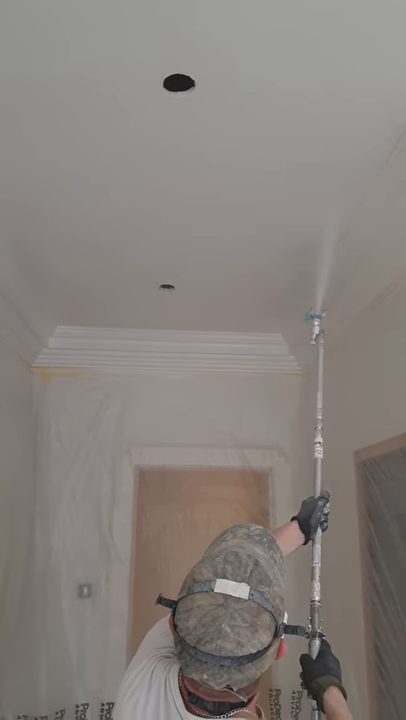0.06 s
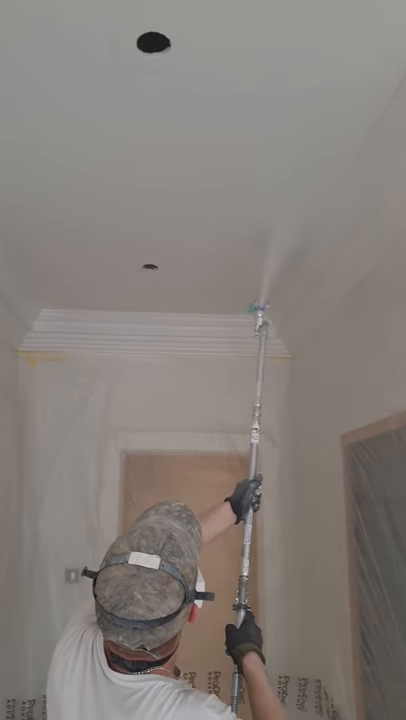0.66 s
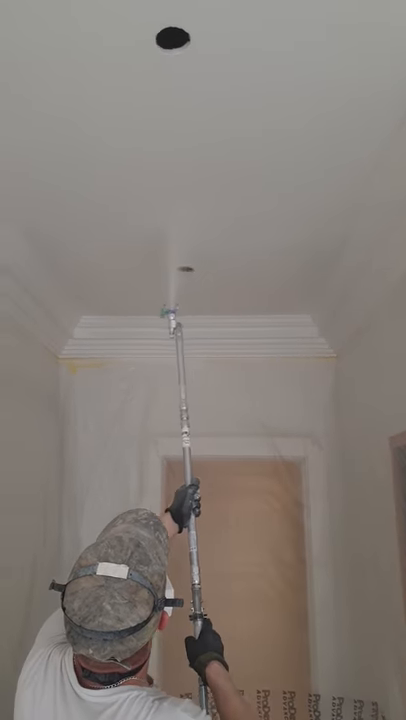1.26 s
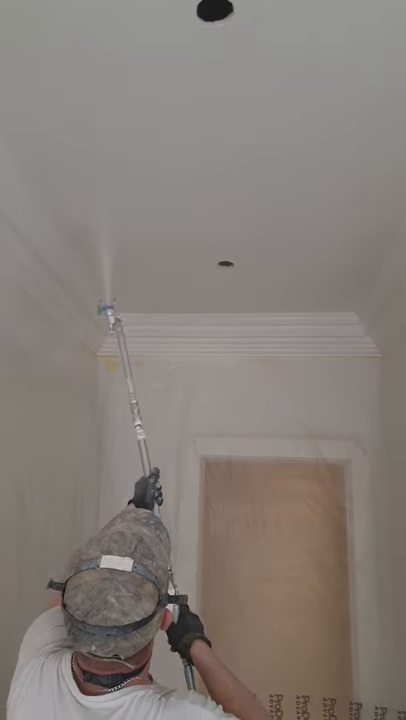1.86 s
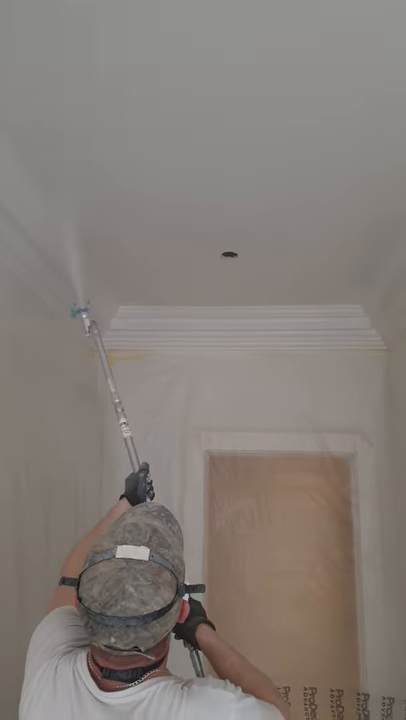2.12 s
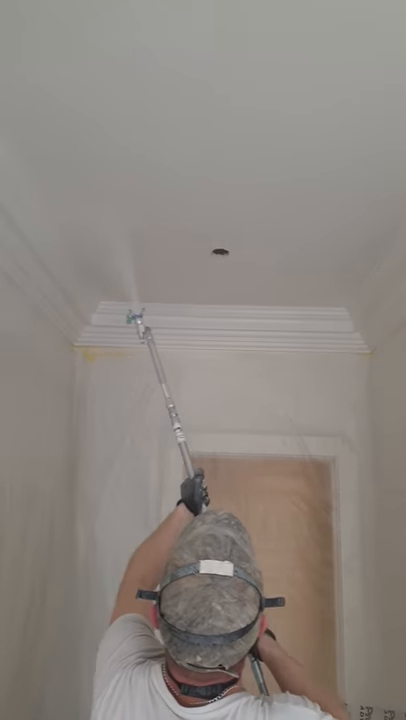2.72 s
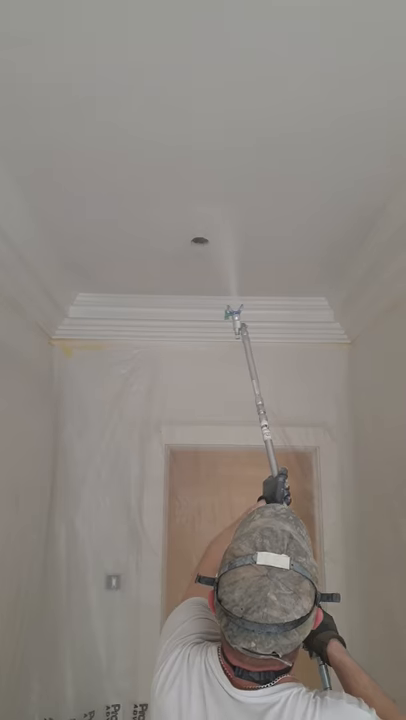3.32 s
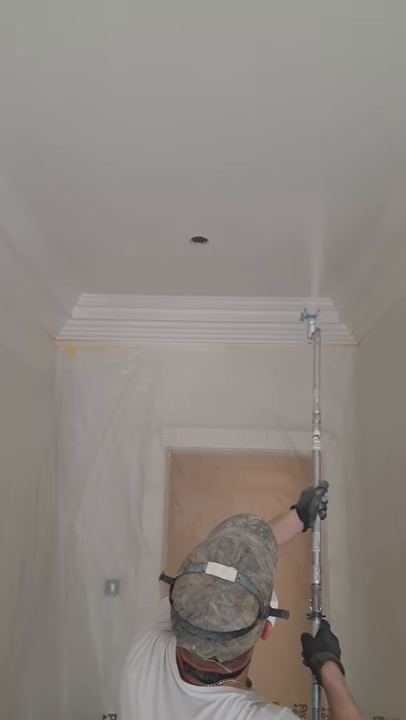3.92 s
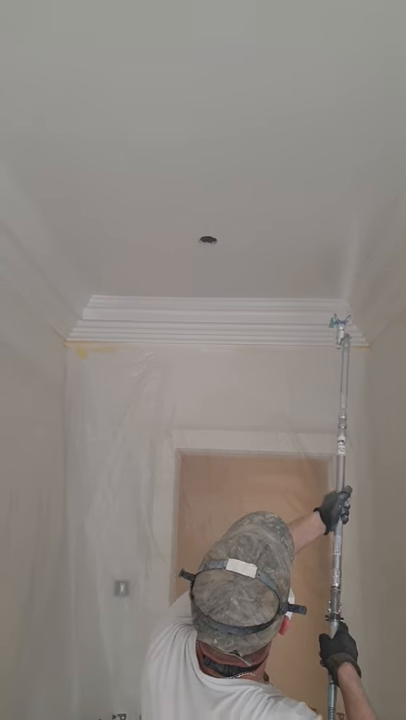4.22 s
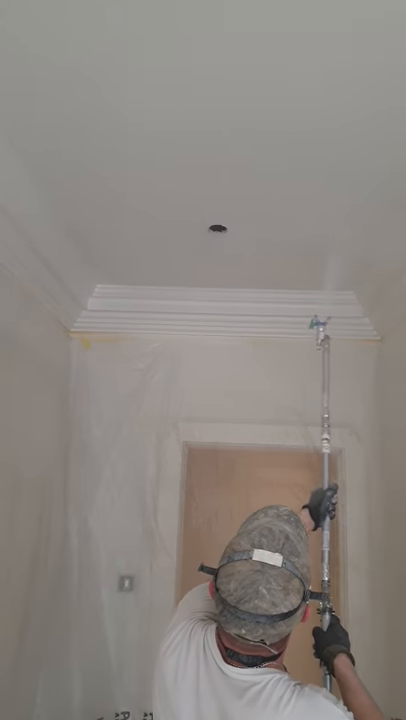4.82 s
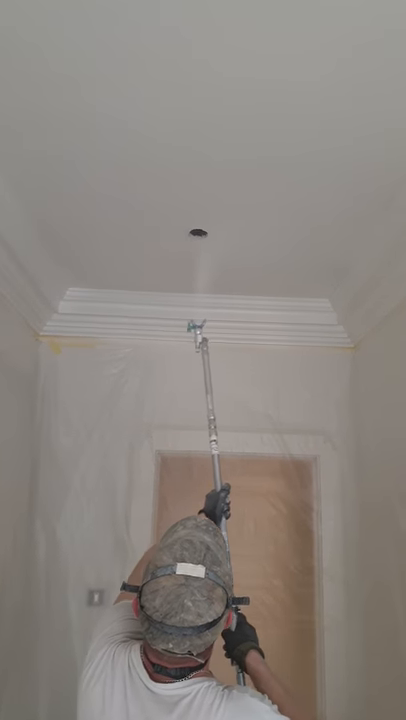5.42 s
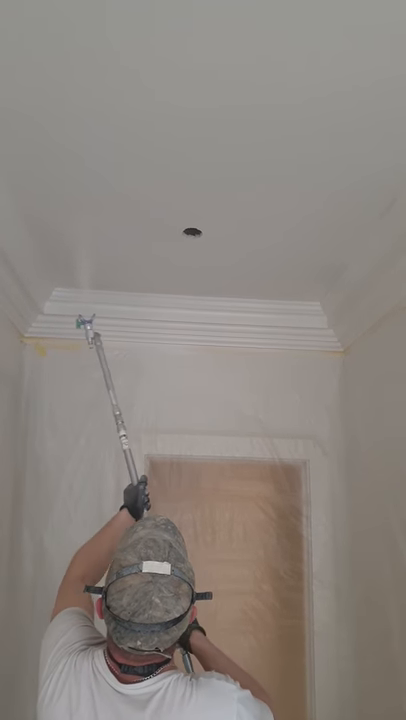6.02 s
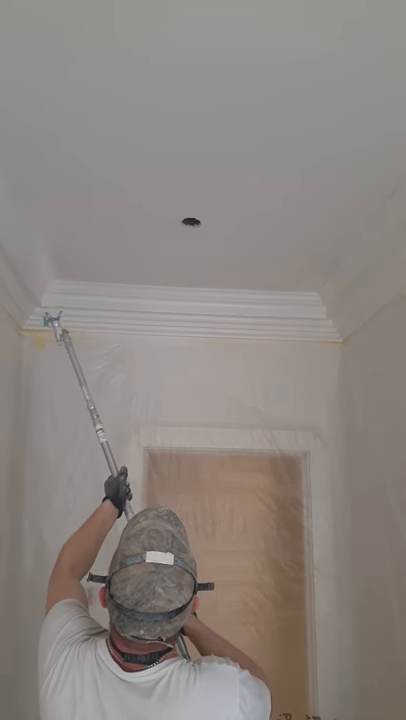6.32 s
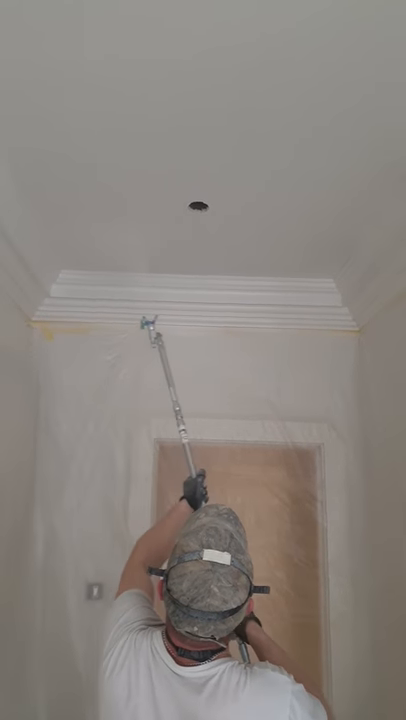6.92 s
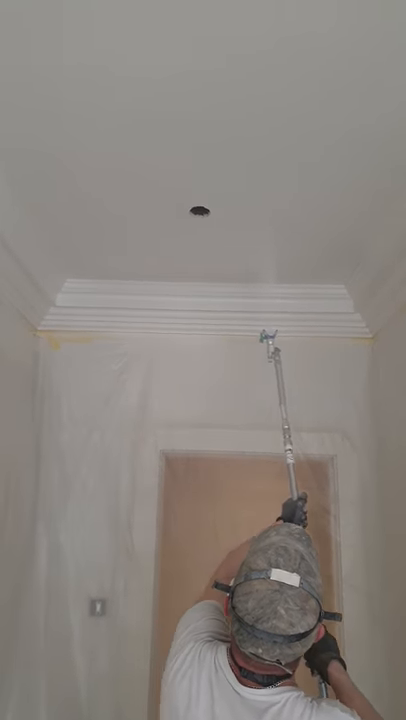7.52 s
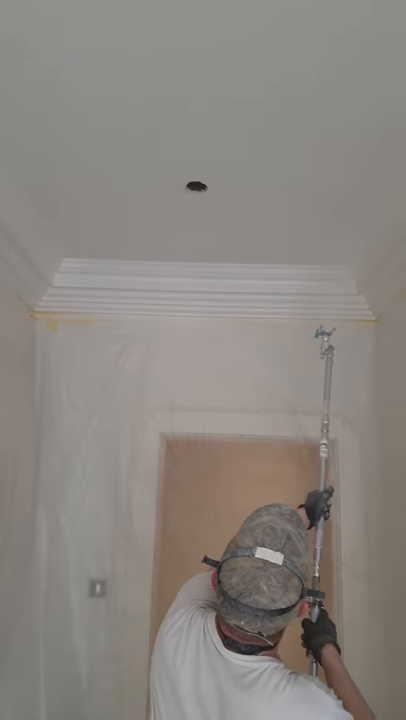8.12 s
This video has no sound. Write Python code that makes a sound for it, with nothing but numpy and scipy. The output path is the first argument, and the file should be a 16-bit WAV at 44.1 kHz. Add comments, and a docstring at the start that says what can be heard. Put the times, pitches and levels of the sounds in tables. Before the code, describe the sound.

From the first moment, an airless paint spray gun gives a loud, bright, slightly fluttering hiss, near and a little to the left. It continues without a break for the whole eight seconds or so. Further off, a quieter piston pump makes its first stroke at about 0.2 seconds and repeats roughly every two thirds of a second, twelve times in all, the last at about 7.5 seconds. Each stroke begins with a brief electric hum, spins up into a growling whine with clattering gears, then falls in pitch and fades within about half a second. The hiss lifts with each push and eases as the pressure drops. The strokes grow slightly stronger, peaking around 6 to 7 seconds. Underneath are a faint wash of air and a low boom, with the short reverberation of a bare hallway.

```python
"""An airless spray gun on a pole paints the ceiling of a bare hallway.
From the outset the jet hisses without a break, and the air it stirs excites standing waves.
One and a half times a second the piston pump, further off, makes a stroke: its motor hums under
the inrush of current, then spins up with whining, clattering gears. The rising pressure lifts
the hiss; then the pressure leaks away and the motor coasts down until the next stroke."""
import sys
import numpy as np
from scipy import signal
from scipy.fft import rfft, irfft
from scipy.io import wavfile
from scipy.ndimage import uniform_filter1d

SR = 44100
rng = np.random.default_rng(int(sys.argv[2]) if len(sys.argv) > 2 else 0)


def master_out(mix):
    """Clip the mix to full scale and print it as 16-bit PCM to the path in sys.argv[1]."""
    frames = np.transpose(np.atleast_2d(mix))
    ceiling = np.clip(frames, -1, 1)
    pcm = np.round(ceiling * 32767).astype(np.int16)
    wavfile.write(sys.argv[1], SR, pcm)


N = 359856
TIME = np.arange(N) / SR


def from_db(db):
    """Amplitude grows tenfold with every 20 dB."""
    return np.exp(np.asarray(db) * np.log(10) / 20)


def rms_one(x):
    """Division by the root mean square gives unit power."""
    return x / np.sqrt(np.mean(x ** 2) + 1e-20)


def follow(rows, clock=TIME):
    """Linear interpolation reads each column of a curve at the given times."""
    times, *columns = np.transpose(rows)
    return [np.interp(clock, times, column) for column in columns]


def at_hz(points, hz):
    """Interpolation reads a spectrum on a logarithmic frequency axis."""
    knots_hz, values = np.transpose(points)
    return np.interp(np.log(hz + 1), np.log(knots_hz), values)


def drift(rate_hz):
    """Low-pass filtered noise makes a random fluctuation of unit spread."""
    size = N // 40 + 2
    hz = np.fft.rfftfreq(size, 40 / SR)
    slow = irfft(rfft(rng.standard_normal(size)) / (1 + (hz / rate_hz) ** 2), size)
    return np.interp(TIME, np.linspace(0, N / SR, size), rms_one(slow))


def diffuse_noise(spectrum=None):
    """A diffuse field is coherent at the two ears in the bass and incoherent in the treble."""
    # likeness of the two ears: frequency_hz, correlation
    coherence = [(60, 0.91), (130, 0.95), (290, 0.93), (640, 0.39), (1300, -0.2), (3000, -0.013)]
    hz = np.fft.rfftfreq(N, 1 / SR)
    mid, side = rfft(rng.standard_normal((2, N)))
    alike = np.clip(at_hz(coherence, hz), -1, 1)
    pair = np.sqrt(1 + alike) * mid + np.sqrt(1 - alike) * side * [[1], [-1]]
    gain = 1 if spectrum is None else from_db(at_hz(spectrum, hz))
    return rms_one(irfft(pair * gain, N))


def resonate(x, hz, width_hz):
    """A damped resonator passes a band around its natural frequency, with unit peak gain."""
    r = np.exp(-np.pi * width_hz / SR)
    feedback = [1, -2 * r * np.cos(2 * np.pi * hz / SR), r * r]
    return signal.lfilter(np.array([1, 0, -1]) * (1 - r * r) / 2, feedback, x)


def harmonics(hz, orders, jitter):
    """A slightly unsteady rotation radiates at whole multiples of its rate."""
    phase = 2 * np.pi * np.cumsum(hz * (1 + jitter * drift(58.7))) / SR
    return sum(from_db(db) * np.sin(k * phase + 2 * np.pi * rng.random()) for k, db in orders)


def panned(x, left_db):
    """A level difference between the ears places a sound to the left."""
    return x * from_db(np.array([[.5], [-.5]]) * left_db)


def hallway(x, wet_db, t60_s=.25):
    """Reverberation: the bare walls add an exponentially decaying tail to the direct sound."""
    tail = (diffuse_noise() * from_db(-60 * TIME / t60_s))[:, :SR // 2]
    tail = tail / np.sqrt(np.sum(tail ** 2) / 2)
    wet = from_db(wet_db)
    return (x + wet * signal.fftconvolve(x[None], tail)[:, :N]) / np.hypot(1, wet)


def stroke_clock():
    """The pump works in cycles: seconds since the stroke began, its gain and its pressure swing."""
    # piston strokes: start_s, strength_db, swing_factor
    strokes = [(.155, -1, 0.64), (.822, -2, 0.83), (1.503, -2, 0.62), (2.163, -0.5, .8), (2.85, 0, 1.0),
               (3.51, 1.5, 1.1), (4.172, 1.5, 1.33), (4.823, 2, 0.82), (5.487, 2.2, 1.5), (6.175, 3, .7),
               (6.824, 4, 1.3), (7.486, 1, 1.2)]
    rows = np.array(strokes[:1] + strokes)
    rows[0, 0] -= np.mean(np.diff(rows[1:, 0]))   # the pump is already running
    start, db, swing = rows[np.searchsorted(rows[:, 0], TIME, "right") - 1].T
    return TIME - start, from_db(db), uniform_filter1d(swing, SR // 20)


def line_pressure(since, ebb=-1.22, push=1.97, push_s=.27, leak_per_s=4.2):
    """Relative pressure rises ever more steeply as the piston pushes, then leaks away evenly."""
    rise = push * np.clip(since / push_s, 0, 1) ** 1.8
    return ebb + rise - leak_per_s * np.maximum(since - push_s, 0)


def standing_waves(level_db=-52.5):
    """Stirred air excites the hallway's modes, which boom in step with the line pressure."""
    # room modes: pitch_hz, width_hz, level_db
    modes = [(75, 6.6, -1), (121.8, 5.7, 0), (138, 7, -13), (184, 13, -3), (213.3, 8.5, 0.5),
             (249.5, 10.5, 4), (277.4, 8.4, 3.5), (321.3, 12, -1)]
    since, strength, _ = stroke_clock()
    stir = diffuse_noise()
    boom = rms_one(sum(from_db(db) * resonate(stir, hz, width) for hz, width, db in modes))
    return from_db(level_db + 3.5 * line_pressure(since)) * strength * boom


def mist_wash(level_db=-49, swell_db=2.24):
    """Mist striking the ceiling and moving air make broadband noise that swells at random."""
    # wash spectrum: frequency_hz, density_db
    spectrum = [(28, -32), (55, -8), (100, -2.5), (160, -3.5), (275, 0.5), (340, -4), (400, -6.5), (600, 1),
                (1000, -7), (1400, -5), (2200, -2.5), (3200, -7.5), (6000, -15)]
    return from_db(level_db + swell_db * drift(5.3)) * diffuse_noise(spectrum)


def air_rumble(lift_db=3.5):
    """Moving air makes low-frequency noise that rises and falls."""
    # rumble envelope: time_s, relative_db
    envelope = [(0.0, -68), (1.52, -75), (2.04, -62), (2.91, -75), (3.34, -58), (3.45, -69), (5.57, -57),
                (5.68, -74), (8.14, -68), (8.16, -63)]
    # rumble spectrum: frequency_hz, density_db
    spectrum = [(20, -22), (35, -15), (55, 7), (70, 4), (100, -8), (200, -20)]
    relative_db, = follow(envelope)
    return from_db(relative_db + lift_db) * diffuse_noise(spectrum)


def load_db(since, peak_s=.2, off_s=.46, build_db_per_s=91, sag_db_per_s=30, coast_db_per_s=78):
    """The load builds to a peak, sags while the motor pushes, and drops once it is switched off."""
    build = build_db_per_s * np.maximum(peak_s - since, 0)
    sag = sag_db_per_s * np.maximum(since - peak_s, 0)
    coast = coast_db_per_s * np.maximum(since - off_s, 0)
    return -build - sag - coast


def pump_body(x):
    """Forced vibration: the pump body and hose ring at their natural frequencies."""
    # body and hose resonances: pitch_hz, width_hz, gain_db
    modes = [(252, 20, -11), (325, 35, -22), (492, 30, -12), (576, 21, 2), (614, 16, -10), (735, 38, 3),
             (792, 28, -6), (888, 30, -13), (1680, 140, -23)]
    return sum((-1) ** k * from_db(db) * resonate(x, hz, width)
               for k, (hz, width, db) in enumerate(modes))


def gear_mesh(since, wander, start_hz=388.2, limit_hz=900, rise_s=.1, slows_s=.27, fall_hz_per_s=720):
    """Teeth sound at their meshing rate, which climbs quickly and falls as the motor slows."""
    # mesh harmonics: multiple, level_db
    orders = [(1, 3.5), (2, 3.5), (3, 3), (4, 4)]
    run_up = limit_hz - (limit_hz - start_hz) * np.exp(-since / rise_s)
    pitch_hz = run_up - fall_hz_per_s * np.maximum(since - slows_s, 0)
    return harmonics(pitch_hz * wander, orders, jitter=.028)


def motor(since, wander, load_share=.58, surge_s=.012):
    """The rotor vibrates at harmonics of its speed; the level follows the load, with brief surges."""
    # spin-up and coast-down: stroke_time_s, rotation_hz
    speed = [(0, 100), (.072, 105), (.13, 183), (.15, 185), (.18, 250), (.22, 244), (.248, 204),
             (.275, 193), (.39, 184), (.46, 145), (.66, 95)]
    # rotor harmonics: multiple, level_db
    orders = [(1, -2), (2, -8), (3, 0), (4, -5), (5, -6), (6, -10), (7, -3)]
    # surges of the drive: stroke_time_s, boost_db
    surges = [(.074, 13.5), (.14, 9.5), (.21, 11), (.252, 12.5), (0.295, 11), (.385, 9)]
    rotation_hz, = follow(speed, since)
    surge_db = sum(db * np.exp(-((since - s) / surge_s) ** 2) for s, db in surges)
    drive_db = load_share * load_db(since) + surge_db + 1.2 * drift(30)
    return from_db(drive_db) * harmonics(rotation_hz * wander, orders, jitter=.005)


def gear_clatter(level_db=-38.5):
    """Impacts of loose teeth spread their energy over a broad, flickering band of noise."""
    # clatter spectrum: frequency_hz, density_db
    spectrum = [(60, -40), (150, -4.5), (220, -4), (400, 0), (650, 10), (950, 6.5), (1300, -1.5),
                (1680, 2.5), (2100, -1.5), (3400, -4.5), (5000, -16), (9000, -40)]
    return from_db(level_db + 1.74 * drift(46)) * diffuse_noise(spectrum)


def inrush_hum(since, level_db=-50, pitch_hz=102, peak_s=.077, width_s=.06):
    """The inrush of current hums briefly at twice the mains frequency."""
    envelope = np.exp(-((since - peak_s) / width_s) ** 2)
    return from_db(level_db) * envelope * np.sin(2 * np.pi * pitch_hz * TIME)


def piston_thud(load, level_db=-57, pitch_hz=77):
    """The piston thuds: a narrow band of low noise, amplitude-modulated by the load."""
    ring = resonate(diffuse_noise(), pitch_hz, width_hz=5.6)
    return from_db(level_db) * load * rms_one(resonate(ring, pitch_hz, width_hz=30.16))


def pump(motor_db=-41.5, mesh_db=-45, whine_db=-52, rattle_db=-44):
    """Source and filter: motor and gear harmonics sweep up and down through the body's resonances."""
    since, strength, _ = stroke_clock()
    load = from_db(load_db(since))
    wander = 1 + .005 * drift(3)   # no two strokes run at quite the same speed
    gears = load * gear_mesh(since, wander)
    growl = pump_body(from_db(motor_db) * motor(since, wander) + from_db(mesh_db) * gears)
    whine = from_db(whine_db) * load * gears   # the teeth sing out only under full load
    rattle = from_db(rattle_db) * load * rms_one(pump_body(diffuse_noise()))   # teeth shake the body
    noises = load * gear_clatter() + inrush_hum(since) + piston_thud(load)
    body_sound = strength * (hallway(growl, wet_db=-10.5) + rattle)
    return panned(body_sound + hallway(whine, wet_db=-5) + noises, left_db=2.5)


def near_echoes(x, share=.091, count=10, delay_s=(.0002, .004)):
    """Comb filtering: short echoes off ceiling and walls come and go as the pole moves."""
    lags = (rng.uniform(*delay_s, count) * SR).astype(int)
    return x + sum(share * drift(5.7) * np.roll(x, lag, axis=1) for lag in lags)


def nozzle(level_db=-22, rise_db_per_s=.1018, flutter_db=.45, split_hz=5500):
    """Atomisation: paint tears into mist with a fluttering hiss that swells at each piston push."""
    # jet spectrum: frequency_hz, density_db
    spectrum = [(1200, -31), (2200, -23.5), (3200, -15.5), (4200, -13.5), (5300, -11.5), (6200, -7.5),
                (6900, -8.5), (7800, -3.5), (9400, -2.5), (10900, 0.5), (12300, 0.5), (14000, -2),
                (15700, -4.5)]
    # sweep of the pole: time_s, leftward_lean, low_cut_db
    sweep = [(0.0, 4.5, -0.5), (1.86, 2, 0.9), (3.91, 3.5, -0.2), (6.16, 2.5, 0.3), (8.16, 4, -0.6)]
    since, _, swing = stroke_clock()
    lean, low_cut_db = follow(sweep)
    jet = near_echoes(diffuse_noise(spectrum))
    lows = signal.sosfiltfilt(signal.butter(2, split_hz, fs=SR, output="sos"), jet)
    # the treble is the more directional part, and the part that follows the pressure
    treble = from_db(swing * line_pressure(since)) * panned(jet - lows, lean + .5)
    hiss = panned(lows * from_db(-low_cut_db), lean * .32) + treble
    return from_db(level_db + rise_db_per_s * TIME + flutter_db * drift(75)) * hiss


def scene():
    """Superposition: the sounds of nozzle, pump and stirred air add."""
    sprayer = nozzle() + pump()
    air = standing_waves() + mist_wash() + air_rumble()
    return sprayer + panned(air, left_db=2.1)


def record(dry, cutoff_hz=15750):
    """Band limiting: an elliptic low-pass filter cuts the highest treble steeply."""
    return signal.sosfilt(signal.ellip(14, .1, 80, cutoff_hz, fs=SR, output="sos"), dry)


dry = scene()
out = record(dry)
master_out(out)
```